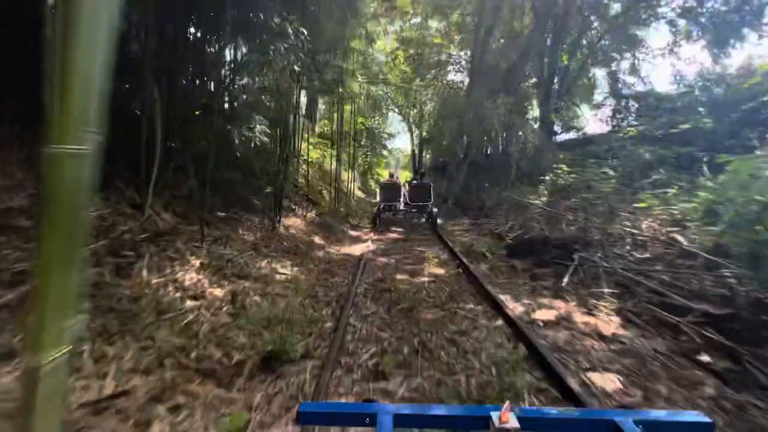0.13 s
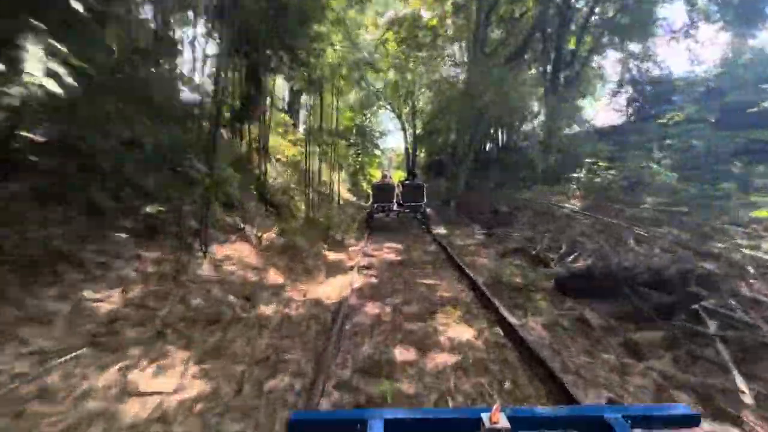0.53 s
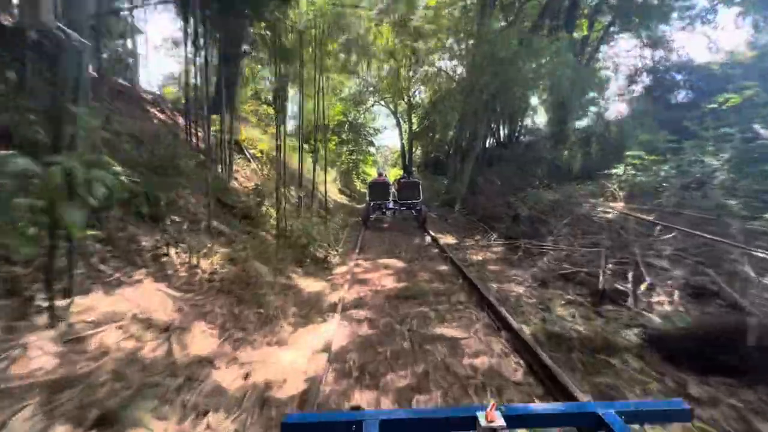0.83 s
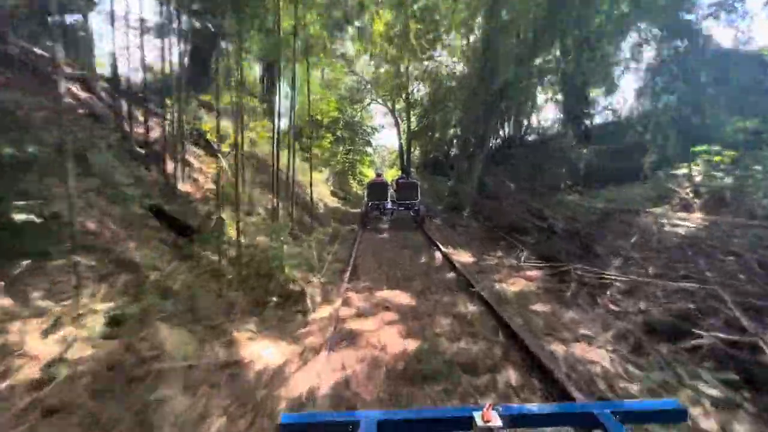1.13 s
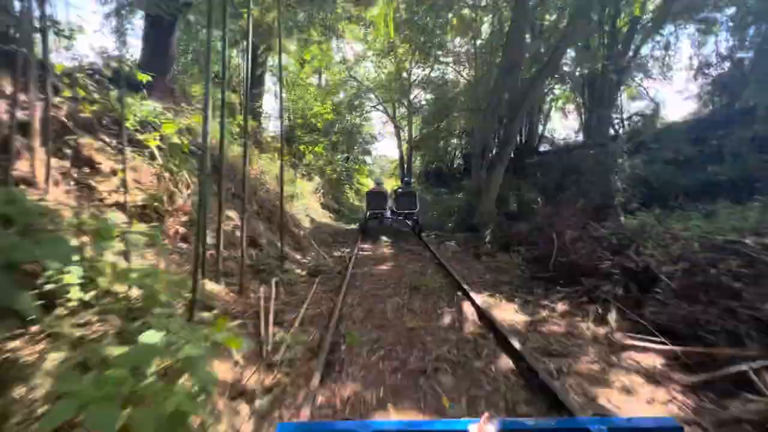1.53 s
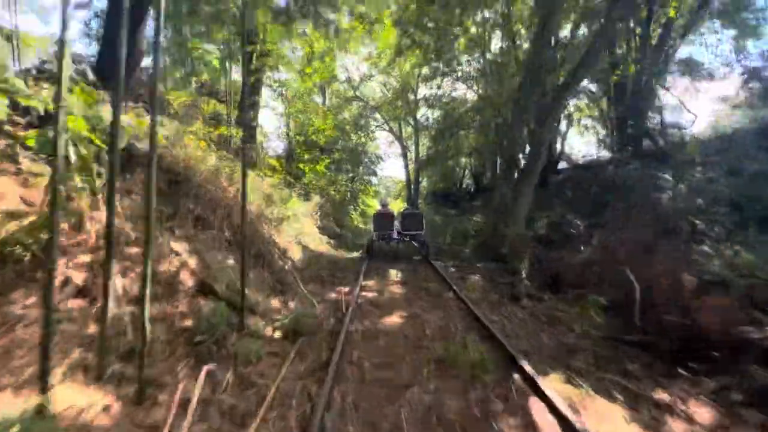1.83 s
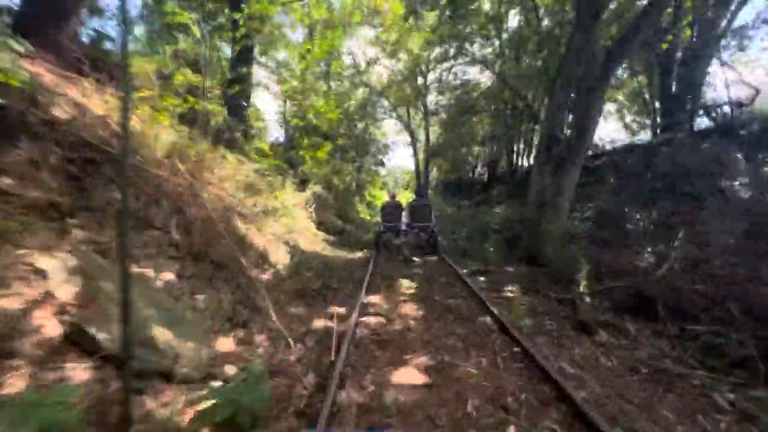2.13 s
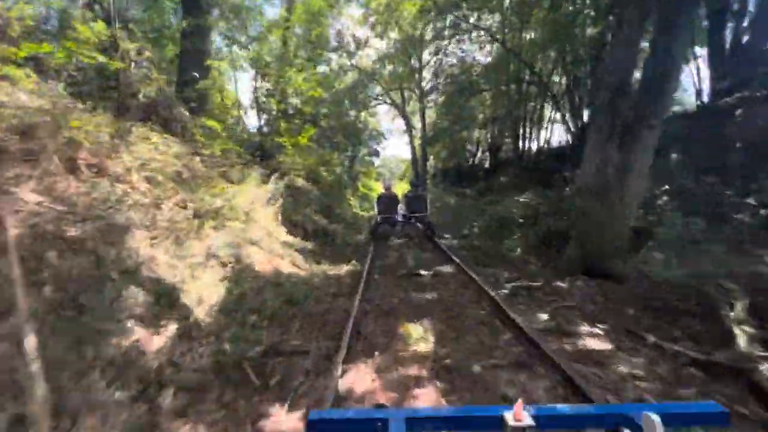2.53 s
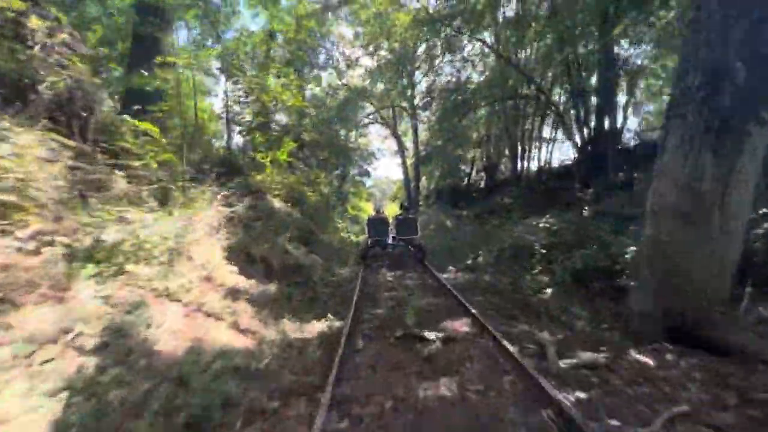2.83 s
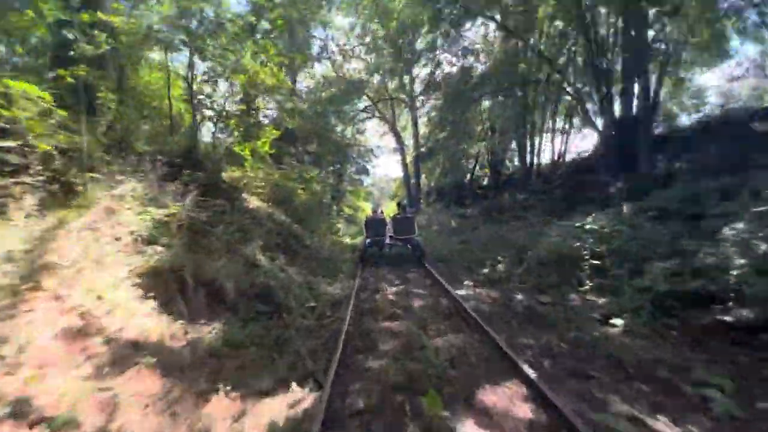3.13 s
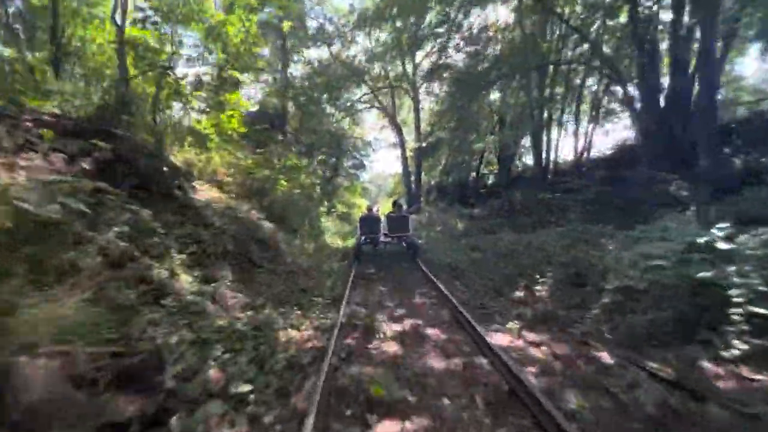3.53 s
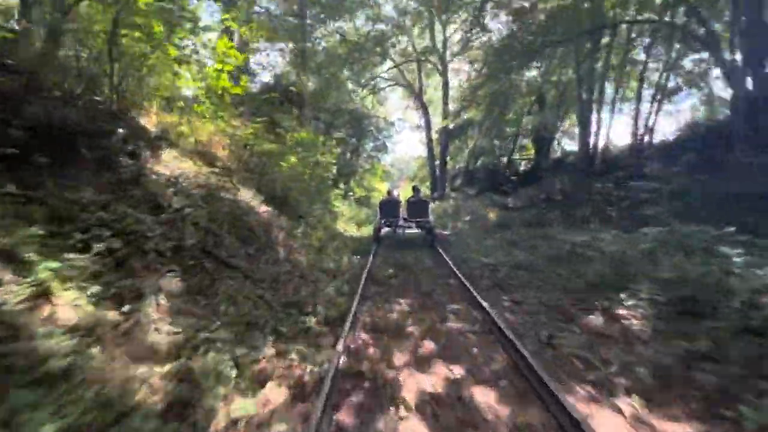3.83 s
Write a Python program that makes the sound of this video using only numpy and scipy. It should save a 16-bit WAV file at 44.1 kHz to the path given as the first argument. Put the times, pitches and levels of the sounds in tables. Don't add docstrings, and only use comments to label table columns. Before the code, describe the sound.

Rail cart wheels rumble and hiss along a jointed track, with hard metallic clacks at each joint.

```python
import sys
import numpy as np
from scipy import signal
from scipy.fft import rfft, irfft
from scipy.io import wavfile
from scipy.ndimage import uniform_filter1d, map_coordinates

SR = 44100
rng = np.random.default_rng(int(sys.argv[2]) if len(sys.argv) > 2 else 0)


def ratio_of_db(decibels):
    return 10 ** (np.asarray(decibels, float) / 20)


def wav_out(sig):
    wavfile.write(sys.argv[1], SR, np.round(np.clip(np.atleast_2d(sig).T, -1, 1) * 32767).astype(np.int16))


N = 176400
T = np.arange(N) / SR
HZ = np.arange(N // 2 + 1) * SR / N + 1e-3


def unit(x):
    return x / np.sqrt(np.mean(x ** 2))


def over_hz(table):
    hz, value = np.array(table).T[:2]
    return np.interp(np.log(HZ), np.log(hz), value)


def over_time(table):
    return np.interp(T, *np.array(table).T)


def colour(x, table):
    below = np.maximum(np.log2(table[0][0] / HZ), 0)
    above = np.maximum(np.log2(HZ / table[-1][0]), 0)
    return irfft(rfft(x) * ratio_of_db(over_hz(table) - 12.6 * (below + above)), N)


def body(x, table):
    response = 0
    for k, (f, width, db) in enumerate(table):
        damping = 1j * HZ * width
        response = response + (-1) ** k * ratio_of_db(db) * damping / (f * f - HZ * HZ + damping)
    return irfft(rfft(x) * response, N)


def walk(rate):
    k = int(SR / rate)
    held = np.repeat(rng.standard_normal(N // k + 1), k)
    return 1.47 * uniform_filter1d(uniform_filter1d(held, k), k)[:N]


def grains(spread_db, size=1):
    force = np.minimum(rng.exponential(size=N // size + 1), 4.5)
    force = np.repeat(force, size)[:N]
    return unit(rng.standard_normal((3, N)) * ratio_of_db(spread_db * force))


def add_at(out, start_s, sound):
    i = int(start_s * SR)
    out[..., i:i + sound.shape[-1]] += sound[..., :N - i]


def pair(x, lag_s):
    # (frequency [Hz], share [0-1])
    likeness = [(60, 0.16), (250, 0.73), (2000, 0.25), (4500, 0.081), (8000, 0.077), (11000, 0.96)]
    # (frequency [Hz], phase [rad])
    port_turn = [(100, 1.08), (400, 0.73), (1000, 0.23)]
    like = np.clip(over_hz(likeness), 0, 1)
    spec = rfft(x)
    shared = spec[0] * np.sqrt(like)
    turned = irfft(shared * np.exp(-1j * over_hz(port_turn)), N)
    left = map_coordinates(turned, [(T - lag_s) * SR], mode="mirror")
    own = irfft(spec[1:] * np.sqrt(1 - like), N)
    return np.array([left, irfft(shared, N)]) + own


def wind():
    # (time [s], level [dB])
    gusts = [(0, -75), (.7, -45), (1.35, -36), (1.55, -20), (1.79, -24.5), (1.84, -30.5), (2.1, -45.5),
             (2.27, -36), (2.65, -47), (2.95, -40.5), (3.3, -55), (3.7, -39.5), (4, -37)]

    def buffet():
        low = body(rng.standard_normal(N), [(77, 140, 0)])
        return unit(body(low, [(97.0, 630, 0)]))

    a, b = buffet(), buffet()
    level = ratio_of_db(over_time(gusts) + 6.5 + 0.93 * walk(21.29))
    return level * np.array([a + .5 * b, -.7 * a + 0.31 * b])


def bird():
    # (time [s], pitch [Hz], level [dB], half length [s])
    peeps = [
        (3.146, 5820, -44.5, 0.037),
        (3.394, 5750, -41, 0.034),
    ]
    out = np.zeros(N)
    for s, hz, db, half_s in peeps:
        u = T - s
        swell = np.exp(-(u / half_s) ** 2)
        phase = 2 * np.pi * (hz + 500 * u) * u + 0.27 * walk(220)
        out += ratio_of_db(db) * swell * np.sin(phase)
    return ratio_of_db(1.5 * walk(300)) * out


def chinks():
    # (time [s], level [dB])
    shakes = [
        (.247, -29.5),
        (.262, -34),
        (1.447, -35),
        (1.532, -40),
        (2.045, -40),
        (2.082, -41.5),
        (2.349, -36.5),
        (2.487, -37.5),
        (2.5, -39),
    ]
    # (frequency [Hz], level [dB], t60 [s])
    loose_modes = [(5140, -11, .06), (6320, -13, .05), (7325, 0, .09), (8836, -13, .1), (9126, -7, .2),
                   (9810, -18, .1), (11135, -10, .1), (12510, -15, .07), (13070, -16, .1), (14640, -19, .1)]
    out, u = np.zeros(N), T[:SR // 5]
    draws = rng.standard_normal((len(shakes), 2, len(loose_modes)))
    for (s, db), (balance, detune) in zip(shakes, draws):
        ring = 0
        for (f, g, t60), a, b in zip(loose_modes, balance, detune):
            fade = ratio_of_db(g + 2.7 * a - 60 * u / (1.12 * t60))
            ring = ring + fade * np.sin(2 * np.pi * f * (1 + 0.0021 * b) * u)
        add_at(out, s, ratio_of_db(db + 9.5) * np.minimum(u / 0.0012, 1) * ring)
    return out * ratio_of_db(2.9 * walk(250))


def clinks():
    # (time [s], level [dB], tilt [dB per octave])
    jangles = [(.248, -29, -4), (1.441, -28.5, 2), (1.447, -25, 4), (1.4835, -27, 9), (1.496, -23, 7.5),
               (1.527, -31.5, 2), (2.031, -26.5, -10), (2.045, -43, 2), (2.359, -35, -22),
               (2.497, -32.5, 4), (2.95, -36.5, 1), (3.19, -29, 5), (3.4545, -31, 9), (3.523, -35, 0),
               (3.785, -28.5, -0.5)]
    # (frequency [Hz], level [dB], t60 [s])
    fitting_modes = [(3464, -13.5, 0.15), (4290, -5, 0.05), (5120, -5.5, .09), (5770, -7, 0.097),
                     (6200, -9.5, 0.23), (6400, -8, 0.081), (6800, -7, 0.12), (7430, -15, .07),
                     (8730, -12.5, 0.1)]
    count = len(fitting_modes)
    out, u = np.zeros((count, N)), T[:SR // 6]
    f, g, t60 = np.array(fitting_modes).T[:, :, None]
    draws = rng.standard_normal((len(jangles), 3, count, 1))
    for (s, db, tilt_db), (balance, detune, phase) in zip(jangles, draws):
        level_db = db + g + tilt_db * np.log2(f / 5120) + 1.8 * balance
        fade = np.minimum(u / 0.002, 1) * ratio_of_db(level_db - 60 * u / t60)
        add_at(out, s, fade * np.sin(2 * np.pi * f * (1 + 0.0029 * detune) * u + phase))
    return sum(mode * (.5 + walk(450)) for mode in out)


def rolling():
    # (time [s], level [dB])
    roll = [(0, -35), (.45, -33), (.7, -35), (1.0, -32.5), (1.4, -31.5), (1.82, -30), (1.97, -35),
            (2.2, -36.5), (2.8, -34.5), (3.06, -37.5), (3.35, -37), (3.6, -33), (4, -35.5)]
    # (frequency [Hz], level [dB])
    wheels = [(40, -6), (70, 0), (130, -9), (300, -12.5), (700, -10.5), (1400, -13), (2300, -20.5)]
    # (frequency [Hz], level [dB])
    hiss = [(2500, 4.5), (4140, -6.5), (5600, 2.5), (9000, -0.5), (12700, -8.5), (13700, -35.5),
            (14500, -4.5), (15900, -17)]
    # (frequency [Hz], width [Hz], level [dB])
    rail_modes = [(489, 54, -4), (1040, 39, -1), (1160, 44, -3), (1283, 53, -2), (1550, 290, -9)]
    gain = ratio_of_db(over_time(roll))
    raw = unit(colour(grains(1.0, size=50), wheels))
    grit = unit(colour(grains(2.6), hiss))
    rumble = 0
    for hz in 56 * 2. ** np.arange(6):
        rumble = rumble + ratio_of_db(3 * walk(22.995)) * body(raw, [(hz, hz * 0.7, 0)])
    rail = sum(ratio_of_db(4.8 * walk(40)) * body(grains(3.2, size=40), [mode]) for mode in rail_modes)
    low = gain * (ratio_of_db(-2.5) * unit(gain) ** 0.43 * rumble + ratio_of_db(-0.67) * unit(rail))
    high = gain ** 0.61 * ratio_of_db(-22 + 1.2 * walk(24.63)) * grit
    return low, high


def ticks():
    # (time [s], peak level [dB], centre [Hz])
    knocks = [
        (0.1742, -26, 6460),
        (.964, -13.5, 1460),
        (.995, -19, 1200),
        (1.091, -12, 1550),
        (1.252, -12.5, 1660),
        (1.76, -5.5, 152.3),
        (3.596, -20, 1035),
        (3.914, -17, 980),
    ]
    out, u = np.zeros((3, N)), T[:SR // 8]
    weights = np.hanning(10)[1:-1, None]
    for (s, db, hz), (place, phase) in zip(knocks, rng.random((len(knocks), 2, 3, 8, 1))):
        tones = hz * ratio_of_db(10 * (np.arange(8)[:, None] + place) / 8 - 5)
        ring = (weights * np.sin(2 * np.pi * (tones * u + phase / 2))).sum(axis=1) / 2
        decay_db = 60 * u / 0.035 * np.sqrt(hz / 1200)
        add_at(out, s, ratio_of_db(db + 1.0 - decay_db) * np.minimum(u * hz / 2, 1) * ring)
    return out


def rings():
    # (time [s], peak level [dB], centre [Hz], t60 [s])
    hits = [(.015, -18, 1370, .05), (.247, -4.5, 200, 0.095), (.049, -15, 910, .03),
            (.249, -12, 1820, 0.047), (.251, -8, 516, 0.071), (.262, -9, 2270, 0.048),
            (0.339, -14, 159, 0.14), (.531, -17, 820, 0.15), (1.44, -12.5, 998, 0.055),
            (1.448, -16, 1304, 0.045), (1.461, -12, 1520, .05), (1.568, -11, 1330, 0.025),
            (1.678, -22, 1074, 0.069), (1.695, -4.5, 880, 0.012), (1.716, -9, 1390, 0.043),
            (1.727, -13.5, 1010, 0.063), (1.753, -10, 1020, 0.026), (1.779, -7, 174, .14),
            (1.799, -23, 1290, .06), (2.03, -9.5, 1129, 0.057), (2.032, -16, 2010, 0.057),
            (2.314, -19, 1646, 0.054), (2.527, -22, 1180, .04), (3.18, -18, 1350, .03),
            (3.184, -6.5, 997, 0.093), (3.205, -10, 1410, 0.072), (3.204, -23, 3300, 0.018),
            (3.21, -6, 298, 0.017), (3.228, -8, 1134, .03), (3.455, -6.5, 990, 0.063),
            (3.463, -13.5, 3370, 0.033), (3.497, -14, 1300, .03), (3.547, -15, 1036, .06),
            (3.762, -9, 586, 0.017), (3.768, -7, 607, 0.036), (3.778, -3.5, 1116, 0.031),
            (3.787, -8, 350, 0.033)]
    out, u = np.zeros((3, N)), T[:SR // 8]
    for (s, db, hz, t60), (place, phase) in zip(hits, rng.random((len(hits), 2, 3, 3, 1))):
        tones = hz * (1 + 0.097 * (np.arange(3)[:, None] + place - 1.5))
        ring = np.sin(2 * np.pi * (tones * u + phase / 2)).sum(axis=1) / 2
        fade = ratio_of_db(db - 60 * u / max(t60, .005)) * np.minimum(u * hz / 2, 1)
        add_at(out, s, fade * ring)
    return out


def bumps():
    # (time [s], knock [dB], thump re knock [dB], rattle re knock [dB], t60 [s])
    joints = [(0.012, -13.5, -15.5, -22.5, 0.18), (0.048, -17.5, -9.5, -10, 0.42),
              (0.249, -3.5, -14.5, -17.5, 0.2), (0.529, -11.5, -10, -15, 0.35),
              (0.983, -18, -10, -30, 0.16), (1.238, -20, -14.5, -12, 0.41), (1.441, -11.5, -8, -12.5, 0.23),
              (1.481, -10.5, -28, -17.5, 0.47), (1.566, -21, -24, -42, 0.075),
              (1.662, -19.5, -4, -15, 0.12), (1.719, -14.5, -6, -16, 0.19), (1.75, -12.5, -3, -18, 0.046),
              (2.032, -8.5, -19.5, -17, 0.17), (2.312, -14, -15.5, -15.5, 0.27),
              (2.343, -12.5, -30, -15.5, 0.18), (2.479, -22, -13.5, -16, 0.21),
              (3.181, -1.5, -14.5, -21, 0.13), (3.452, -3, -18.5, -19, 0.26), (3.774, -6, -19, -20, 0.21)]
    # (time [s], knock [dB], thump re knock [dB], rattle re knock [dB], t60 [s])
    rebounds = [(0.261, -10, -27, -8, 0.19), (0.318, -29.5, 2, -16, 0.092), (1.883, -25.5, -26, -10, .07),
                (2.044, -10, -28, -10.5, 0.12), (2.086, -16.5, -36, -14.5, 0.31),
                (3.202, -5, -10, -15, 0.12), (3.227, -7.5, -35, -19, 0.18), (3.268, -15, -38, -35, 0.12),
                (3.492, -17.5, -25, -4.5, 0.051), (3.523, -13, -20, -13.5, 0.22),
                (3.787, -6.5, -3, -16.5, 0.035)]
    # (frequency [Hz], width [Hz], level [dB])
    frame_modes = [(582, 118, -5), (984, 78, -3), (1200, 620, -13), (1430, 105, -12), (1846, 660, -12),
                   (2374, 490, -13.5), (2974, 180, -16.5), (3220, 103, -13)]
    # (frequency [Hz], width [Hz], level [dB])
    chassis_modes = [(74, 78, -3), (120.4, 66.4, 3.5), (217, 69, 2.5), (327, 111, -3)]
    # (frequency [Hz], level [dB])
    rattle_tone = [(3500, -2.5), (4200, -6.5), (7350, -2), (10100, -5), (12900, -16.5), (13700, -37),
                   (14700, -13), (15900, -35)]
    attack_s = 0.0022
    stretch = np.array([[1.1], [.85], [.9]])
    tail_db = -25 + np.array([[0], [0], [3.5]])
    power = np.zeros((3, N))
    for s, db, low_db, high_db, t60 in [*joints, *rebounds]:
        i = slice(max(int((s - .05) * SR), 0), int((s + .6) * SR))
        u = T[i] - s + attack_s
        after = np.maximum(u, 0)
        decay = ratio_of_db(-60 * (after / (stretch * max(t60, .01))) ** 1.255)
        hit = np.minimum(after / attack_s, 1) ** 2 * decay
        run_up = ratio_of_db(-7) * np.exp(-np.abs(u) / 0.004)
        tail = (u > 0) * ratio_of_db(tail_db - 60 * after / 0.71)
        power[:, i] += (ratio_of_db([[db + low_db], [db], [db + high_db]]) * (hit + run_up + tail)) ** 2
    thump_env, knock_env, rattle_env = np.sqrt(power)
    thump = body(grains(1.98, size=60) * thump_env, chassis_modes)
    hail = grains(3, size=12) * knock_env
    knock = sum(body(hail * ratio_of_db(2.78 * walk(60)), frame_modes[k::3]) for k in range(3))
    rattle = colour(grains(1.8, size=30) * rattle_env * ratio_of_db(0.47 * walk(82)), rattle_tone)
    return ratio_of_db(22) * thump + ratio_of_db(7) * knock, ratio_of_db(5.5) * rattle


def scene():
    # (time [s], lag [s])
    low_lag = [(1.4, .0001), (2.2, 0.00019)]
    # (frequency [Hz], level [dB])
    pan = [(60, 0.54), (600, 0.59), (1300, 2.2), (2500, 0.38), (4500, 6.3), (8000, 3.8), (15000, 0.11)]
    body_sound, rattle = bumps()
    rumble, hiss = rolling()
    low = body_sound + ticks() + rumble + rings()
    wide = pair(low, over_time(low_lag)) + pair(rattle + hiss, 0.0002533)
    wide = irfft(rfft(wide) * ratio_of_db(np.array([[.5], [-.5]]) * over_hz(pan)), N)
    near = (chinks() + bird()) * ratio_of_db([[5], [-9.5]]) + wind()
    return wide + near + clinks() * ratio_of_db([[4], [-6]])


def low_pass(x):
    return signal.sosfilt(signal.butter(12, 16090, fs=SR, output="sos"), x)


def record(dry):
    bass_cut = signal.butter(4, 47, "high", fs=SR, output="sos")
    top_cut = signal.ellip(8, .2, 70, 15850, fs=SR, output="sos")
    mix = signal.sosfilt(bass_cut, dry)
    mix = signal.lfilter(*signal.iirnotch(10400, 7, fs=SR), mix)
    mix = np.tanh(0.7 * mix) / 0.7
    mix = signal.sosfilt(top_cut, mix)
    return low_pass(mix)


dry = scene()
out = record(dry)
wav_out(out)
```